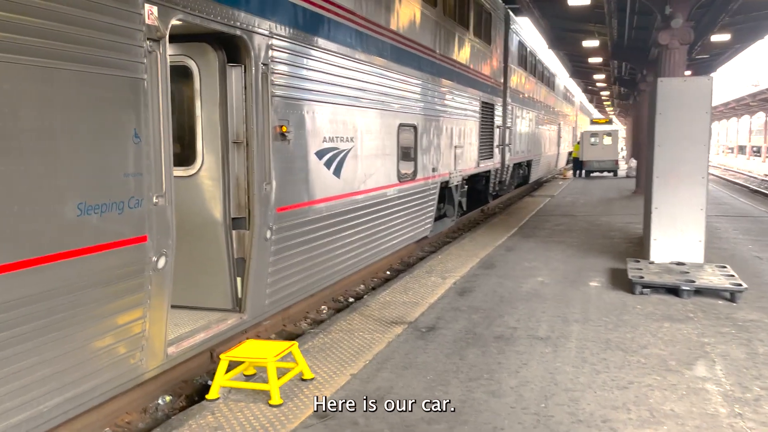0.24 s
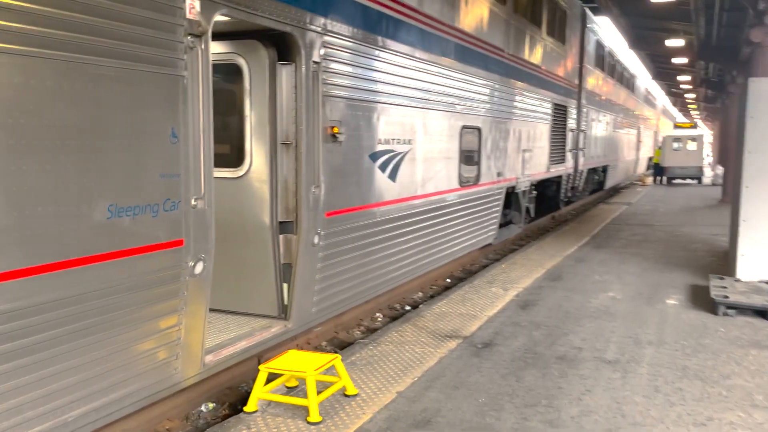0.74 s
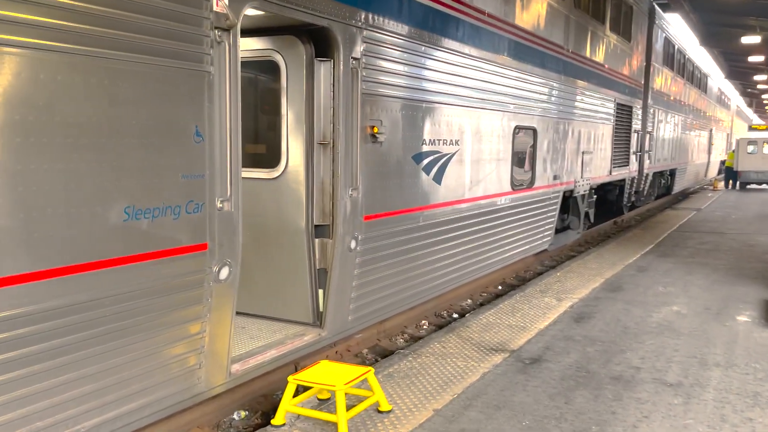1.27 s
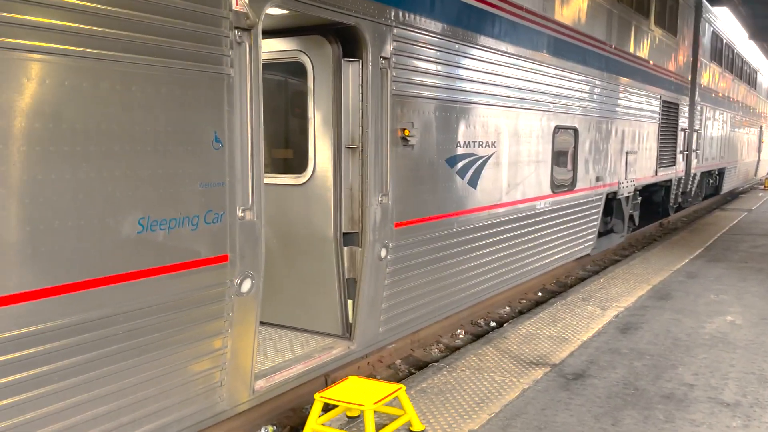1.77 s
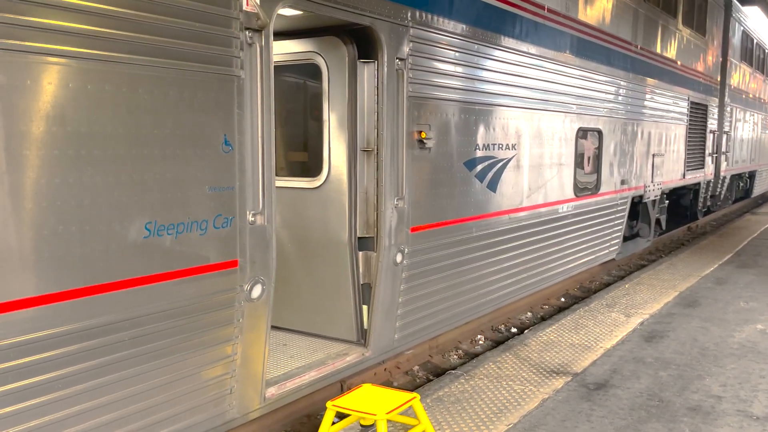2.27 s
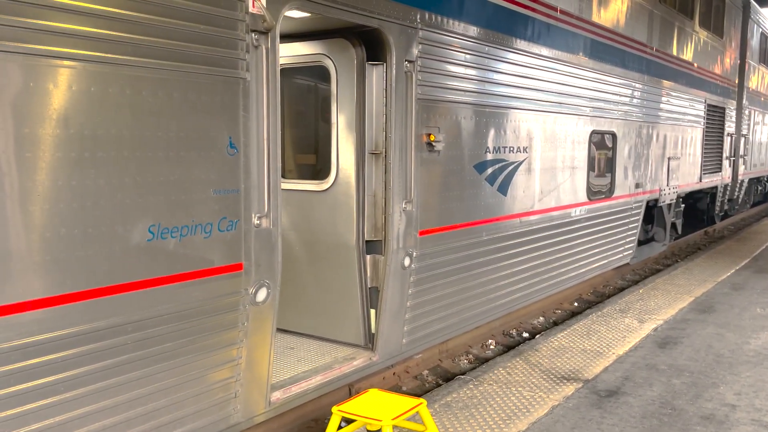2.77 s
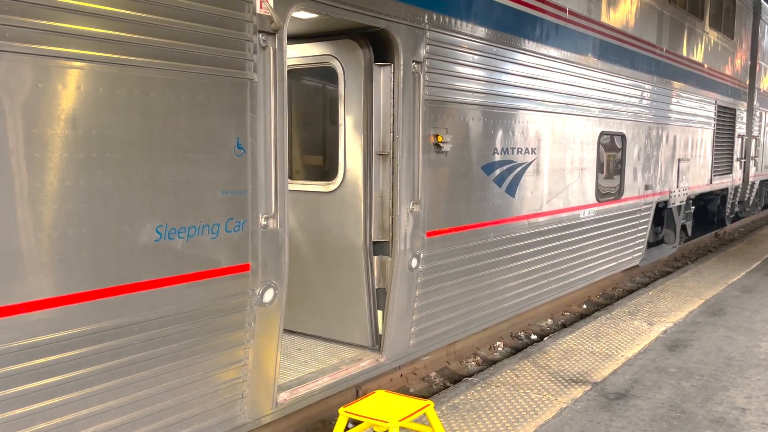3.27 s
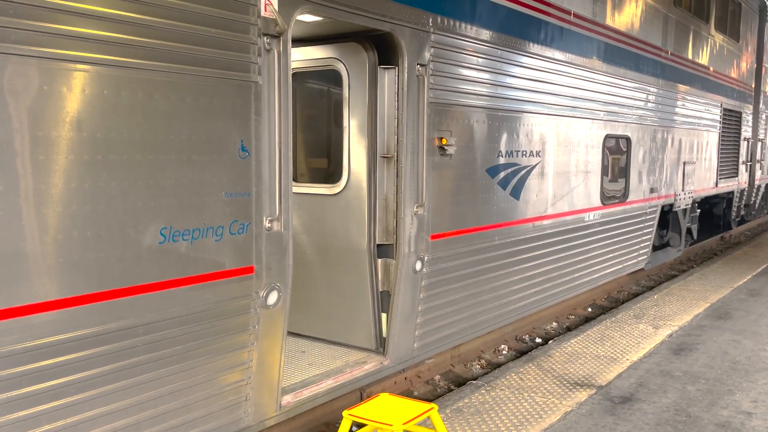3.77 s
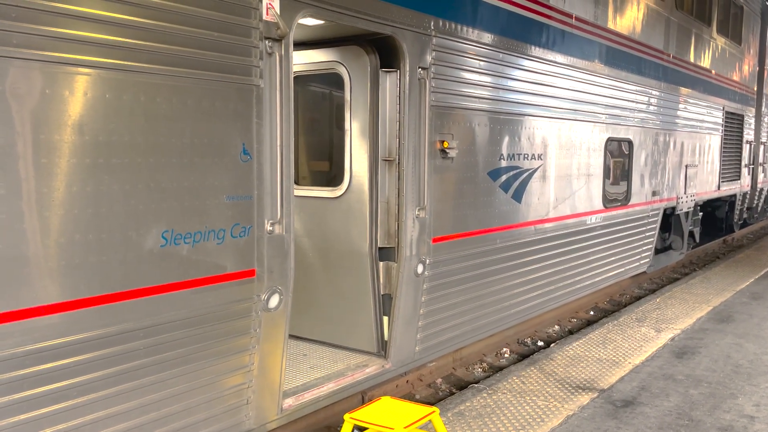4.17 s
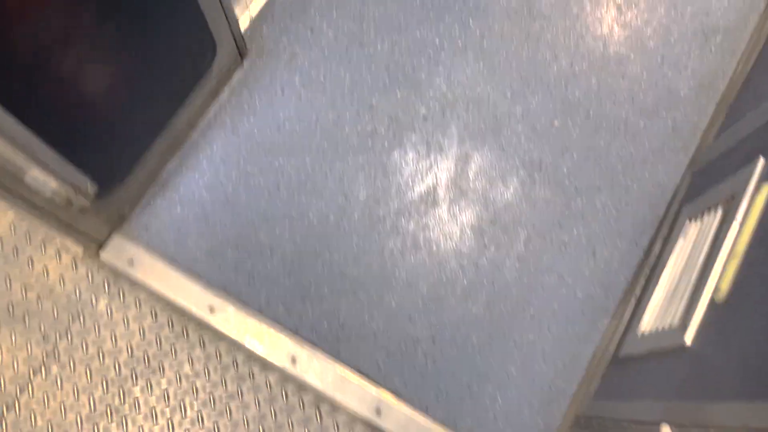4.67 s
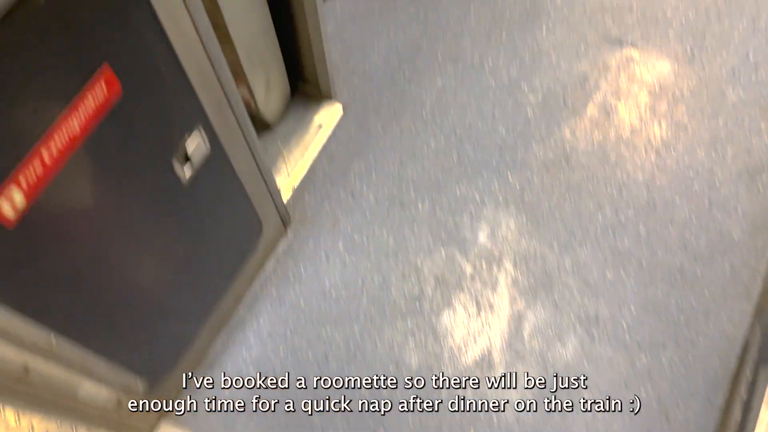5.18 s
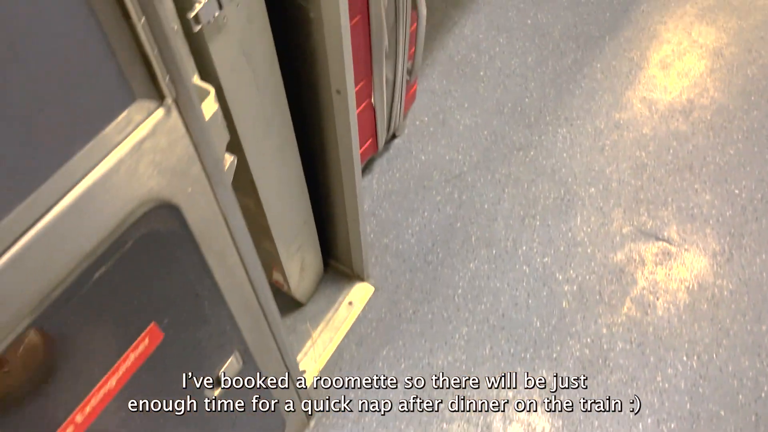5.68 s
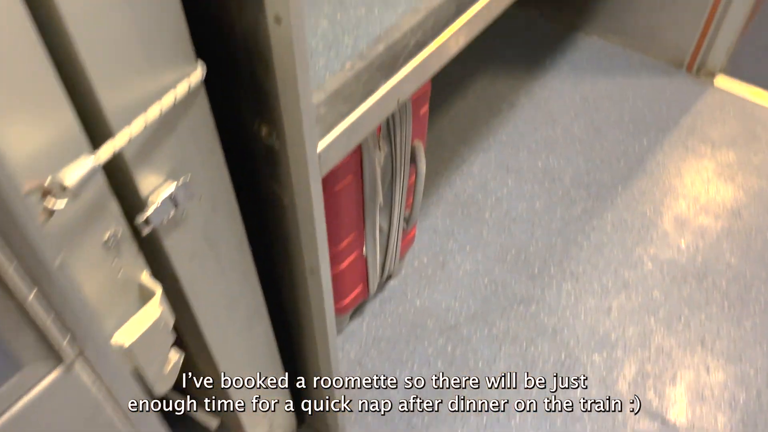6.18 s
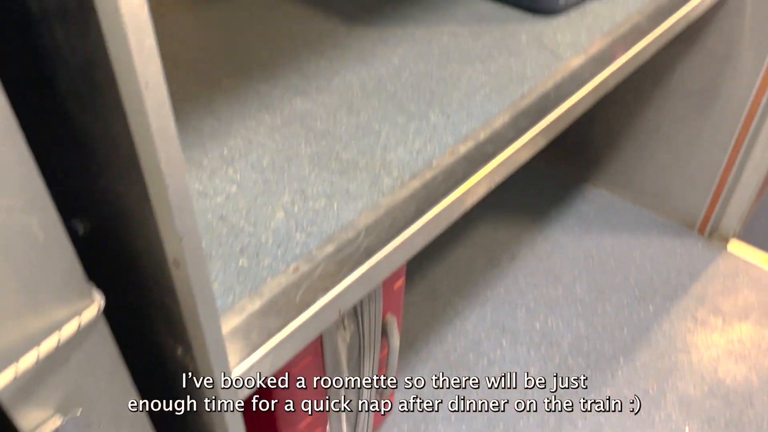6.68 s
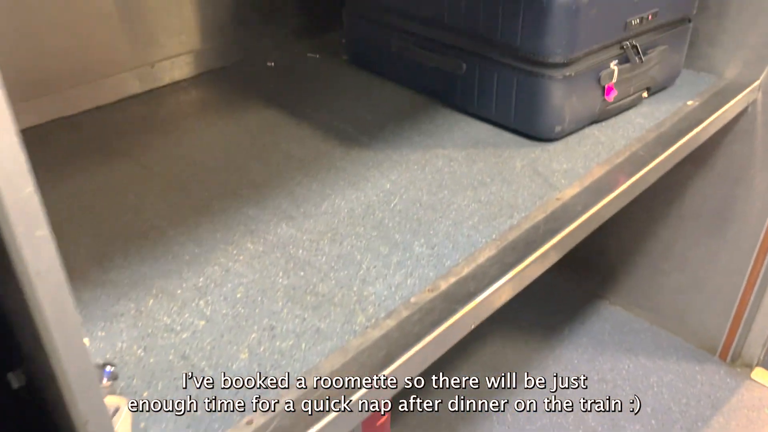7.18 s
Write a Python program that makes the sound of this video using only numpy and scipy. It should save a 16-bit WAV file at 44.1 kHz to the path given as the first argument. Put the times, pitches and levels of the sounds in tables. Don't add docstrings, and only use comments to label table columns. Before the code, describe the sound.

Close stereo pickup of suitcase wheels scraping rough paving, with irregular clacks, hollow thumps and thin ringing metal over a nearby idling diesel engine. The loud outdoor texture dips slightly and switches abruptly to a hushed steel interior, where bass drone and soft airflow continue beneath small ticks and a short, gliding, high squeak. The airy hiss weakens as the listener moves inward.

```python
import sys
import numpy as np
from scipy import signal
from scipy.io import wavfile
from scipy.ndimage import uniform_filter1d

SR = 44100
rng = np.random.default_rng(int(sys.argv[2]) if len(sys.argv) > 2 else 0)


def undo_db(level):
    steps = np.asarray(level, float) / 20
    return 10 ** steps


def wrap_up_sound(samples):
    columns = np.atleast_2d(samples).T
    tamed = np.clip(columns, -1, 1)
    steps = np.round(tamed * 32767).astype(np.int16)
    wavfile.write(sys.argv[1], SR, steps)


N = 327663
T = np.arange(N) / SR
CUT_S = 4.277


def evened(x):
    return x / np.sqrt(np.mean(x ** 2) + 1e-20)


def read(points, hz):
    f, *columns = np.transpose(points)
    return [np.interp(np.log(hz + 1), np.log(f + 1), c)[:, None] for c in columns]


def spread_over_ports(table, z, other, hz):
    like, lead, left_db = read(table, hz)
    like = np.clip(like, 0, 1)
    right = like * z * np.exp(1j * lead) + np.sqrt(1 - like ** 2) * other
    return np.array([z * undo_db(left_db / 2), right * undo_db(-left_db / 2)])


def noise(colour, ports, size, patchy_db, flicker_db):
    frames = 4 * N // size + 5
    hz = np.fft.rfftfreq(size, 1 / SR)
    a, b, c, d, patches = rng.standard_normal((frames, len(hz), 5)).T
    patches = uniform_filter1d(patches, size=6, axis=0)
    patches = evened(uniform_filter1d(patches, size=8192 // size, axis=1))
    flicker = evened(uniform_filter1d(rng.standard_normal(frames), size=4096 // size))
    z = spread_over_ports(ports, a + 1j * b, c + 1j * d, hz)
    z = z * undo_db(read(colour, hz)[0] + patchy_db * patches + flicker_db * flicker)
    return evened(signal.istft(z, nperseg=size, noverlap=3 * size // 4)[1][:, :N])


def placed(x, ports):
    hz, _, z = signal.stft(np.array([x, np.roll(x, shift=-760)]), SR, nperseg=1024)
    return signal.istft(spread_over_ports(ports, z[0], z[1], hz), nperseg=1024)[1][:, :N]


def resonate(x, hz, width):
    turn = np.exp(2j * np.pi * np.cumsum(hz * np.ones(N)) / SR)
    r = np.exp(-np.pi * width / SR)
    return 2 * (turn * signal.lfilter([1 - r], [1, -r], x / turn)).real


def tones(lines, steady, start_s, end_s):
    out = np.zeros(N)
    for hz, width, early_db, late_db in lines:
        fuzz = evened(resonate(resonate(rng.standard_normal(N), hz, width), hz, width))
        sine = np.sin(2 * np.pi * (hz * T + rng.random()))
        sine = sine * (width < hz / 20)
        level = undo_db(np.interp(T, [start_s, end_s], [early_db, late_db]))
        out += level * evened(steady * sine + fuzz)
    return out


def knocks(rows, bed, rise_s, spread):
    out = np.zeros((2, N))
    for s, db, hz, t60 in rows:
        at = round(s * SR)
        t = T[:min(round(t60 * SR), N - at)]
        edges = [hz / spread, min(hz * spread, SR / 2.2)]
        band = signal.butter(2, edges, "band", fs=SR, output="sos")
        rattle = evened(signal.sosfilt(band, bed[:, at:at + len(t)]))
        out[:, at:at + len(t)] += rattle * undo_db(db - 60 * t / t60) * (1 - np.exp(-t / rise_s))
    return out


def swells(floor_db, peak_s, rise_s, fall_s, peak_db):
    late = T[::64, None] - peak_s
    edge_db = 12
    bumps = undo_db(peak_db - edge_db * np.maximum(late / fall_s, -late / rise_s))
    return np.interp(T, T[::64], np.sqrt(undo_db(floor_db) ** 2 + (bumps ** 2).sum(axis=1)))


# pitch_hz, likeness_0_to_1, right_lead_rad, left_over_right_db
PLATFORM_PORTS = [(120, .975, 0, .5), (330, .6, 0, 1), (650, .2, 2.5, 1), (1400, .3, 2.8, 0),
                  (1800, .4, 1.2, -4), (2200, .7, 0, 1), (2800, .5, -1., 2), (4500, .68, -.2, 2),
                  (5600, .35, 0, 0), (6300, .5, 1.8, 2), (7500, .95, 3.1, 0), (11400, .995, 6.28, 0),
                  (14200, .99, 9.3, 0), (16000, .99, 9.5, 0)]
# pitch_hz, density_db_per_hz
RUMBLE_COLOUR = [(20, -45), (40, -18), (65, 9), (90, 1.5), (130, -5), (200, -22), (400, -60)]
# time_s, level_db
IDLE_LEVEL = [
    (0, -25.5),
    (.7, -20),
    (1.5, -19.5),
    (1.9, -22.5),
    (2.6, -18.5),
    (3.5, -23.5),
    (3.72, -18.5),
    (4.0, -25),
    (4.2, -21.5),
]


def engine_rumble():
    time_s, level_db = np.transpose(IDLE_LEVEL)
    level = undo_db(np.interp(T, time_s, level_db) - 2.5)
    return level * noise(RUMBLE_COLOUR, PLATFORM_PORTS, size=2048, patchy_db=-1.3, flicker_db=-1.7)


# pitch_hz, width_hz, early_db, late_db
ENGINE_TONES = [
    (81.78, 4.7, -24, -29.5),
    (71, 8, -29, -41),
    (2206, 25, -56, -56),
    (2792, 42, -52.5, -44),
]


def engine_hum():
    return placed(tones(ENGINE_TONES, steady=0.57, start_s=1.0, end_s=4.1), PLATFORM_PORTS)


# peak_s, rise_s, fall_s, grit_db, scrape_db
ROUGH_STRETCHES = [(.28, 0.014, 0.17, -23.5, -35), (0.384, 0.037, 0.16, -21.5, -37),
                   (.64, 0.29, .3, -29, -42), (.965, .02, 0.25, -27.5, -40),
                   (1.09, 0.14, 0.097, -24.5, -41), (1.3, 0.036, 0.28, -29, -35),
                   (1.46, 0.086, 0.2, -30.5, -39.5), (1.68, 0.092, 0.2, -34.5, -40),
                   (1.94, 0.062, 0.28, -31, -39.5), (2.24, 0.1, 0.44, -27.5, -39.5),
                   (2.41, 0.09, 0.18, -24, -36), (2.5, 0.073, 0.14, -25, -34),
                   (2.63, 0.076, 0.15, -30, -37.5), (2.921, 0.11, 0.25, -23, -36.5),
                   (3.11, 0.07, 0.34, -26, -37.5), (3.2, .08, 0.14, -24, -35),
                   (3.45, 0.072, 0.13, -40, -42), (3.61, 0.11, 0.19, -26.5, -37.5),
                   (3.85, .05, 0.12, -25.5, -36), (4.1, 0.018, 0.15, -35, -36)]
# pitch_hz, density_db_per_hz
GRIT_COLOUR = [(200, -30), (500, 2), (800, 2), (1250, 0.5), (1600, -3.5), (2200, -6), (3200, -9.5),
               (4500, -16), (6000, -18), (9000, -59)]


def wheel_grit():
    *shape, grit_db, _ = np.transpose(ROUGH_STRETCHES)
    level = swells(-32.5, *shape, grit_db) * undo_db(4.0)
    return level * noise(GRIT_COLOUR, PLATFORM_PORTS, size=1024, patchy_db=1.5, flicker_db=0.3)


# pitch_hz, density_db_per_hz
SCRAPE_COLOUR = [(2000, -2), (4000, -3.5), (5500, 0.5), (6500, -1.5), (8000, -2), (10000, -8),
                 (12000, -14.5), (13200, -34), (14500, -24), (16000, -34)]


def wheel_scrape():
    *shape, _, scrape_db = np.transpose(ROUGH_STRETCHES)
    level = swells(-56, *shape, scrape_db) * undo_db(3.5)
    return level * noise(SCRAPE_COLOUR, PLATFORM_PORTS, size=256, patchy_db=1.0, flicker_db=1.26)


# pitch_hz, density_db_per_hz
BOOM_COLOUR = [(60, -33), (130, 1), (250, -2), (400, -6), (600, -11), (1000, -16), (2000, -53.5)]
# peak_s, level_db
CASE_BUMPS = [(.18, -24.5), (.55, -26.5), (.68, -18), (.98, -24), (1.26, -18), (1.39, -21), (1.52, -19.5),
              (1.68, -22), (1.9, -27), (2.25, -20), (2.51, -26), (2.76, -24), (3.13, -20), (3.59, -21.5),
              (3.74, -27), (3.85, -21), (4.07, -21.5)]


def case_boom():
    *shape, grit_db, _ = np.transpose(ROUGH_STRETCHES)
    bump_s, bump_db = np.transpose(CASE_BUMPS)
    rolling = swells(-26, *shape, grit_db + 1)
    bumping = swells(-99, bump_s, 0.029, 0.07, bump_db)
    shaking = np.hypot(rolling, bumping) * undo_db(2.5)
    return shaking * noise(BOOM_COLOUR, PLATFORM_PORTS, size=2048, patchy_db=2.0, flicker_db=0.9)


# start_s, level_db, centre_hz, t60_s
JOINT_JOLTS = [(0.2688, -17, 1880, 0.39), (0.375, -7.5, 2420, 0.27), (0.9532, -13, 1360, 0.18),
               (1.0724, -9, 2050, 0.12), (1.2794, -22, 1810, 0.3), (1.9094, -19, 1900, 0.16),
               (2.3814, -26, 1690, 0.28), (2.4843, -10.5, 1890, 0.55), (2.8784, -22, 1730, 0.42),
               (3.0614, -14.5, 1270, 0.34), (3.1894, -21, 2300, 0.42), (3.5964, -14, 1740, 0.2),
               (3.8294, -26, 1350, 0.3), (4.0894, -42, 1350, 0.3)]


def wheel_jolts():
    bed = noise(GRIT_COLOUR, PLATFORM_PORTS, size=512, patchy_db=3.5, flicker_db=1.5)
    return undo_db(-9.) * knocks(JOINT_JOLTS, bed, rise_s=.008, spread=1.4)


# start_s, pitch_hz, level_db, t60_s
METAL_RINGS = [(.3, 2800, -42, .8), (.385, 2450, -36, .5), (1.06, 2100, -38, .4), (2.045, 4140, -44, 1.5),
               (2.17, 4150, -43, .5), (2.49, 2100, -32, .5), (3.19, 2050, -33, .4), (3.6, 6200, -52, .5),
               (3.6, 830, -33, .5), (3.615, 1750, -35, .5), (3.76, 1850, -30, .5), (3.85, 7600, -47, 2.5),
               (3.85, 12200, -62, 2.5), (3.85, 14100, -64, 2.5), (3.935, 2975, -31, .4),
               (3.99, 2985, -41, .5), (4.02, 2985, -36, .9), (4.235, 2790, -35, 2.), (1.27, 150, -24, 1.),
               (1.47, 265, -25, 1.), (2.23, 205, -26, .8), (2.48, 255, -24, .8), (3.52, 147, -23, 1.2),
               (.98, 740, -33, .6)]


def struck_metal():
    out, shake = np.zeros(N), rng.standard_normal(N)
    for s, hz, db, t60 in METAL_RINGS:
        t = np.maximum(T - s, 0)
        rough = evened(resonate(resonate(shake, hz, 60.), hz, 60.))
        ring = np.sin(2 * np.pi * hz * T) + .5 * rough
        out += ring * undo_db(db - 60 * t / t60) * np.minimum(t / .02, 1)
    return placed(out, PLATFORM_PORTS)


def platform():
    train = engine_rumble() + engine_hum()
    case = wheel_grit() + wheel_scrape() + case_boom() + wheel_jolts() + struck_metal()
    return train + case


# pitch_hz, likeness_0_to_1, right_lead_rad, left_over_right_db
CARRIAGE_PORTS = [(60, .999, 0, -.2), (300, .95, 0, -.5), (750, .2, 0, -1), (2000, .5, 0, 1),
                  (3500, .2, 0, 0), (5300, .25, -.5, 0), (6500, .75, -1.5, 0), (11500, .98, -3.14, 0),
                  (13000, .95, -3.5, 0), (15500, .8, -4.5, 0)]
# pitch_hz, density_db_per_hz
DRONE_COLOUR = [(20, -30), (35, 2), (52, 10.5), (70, 1.5), (97, 8), (125, -1), (160, -12.5), (300, -43)]


def floor_drone():
    return undo_db(-32.5) * noise(DRONE_COLOUR, CARRIAGE_PORTS, size=2048, patchy_db=0.0, flicker_db=-.5)


# pitch_hz, density_db_per_hz
AIR_COLOUR = [(100, -29), (170, -2), (240, 1.5), (310, -7), (450, -3), (600, -10), (1000, -15), (1600, -23),
              (2000, -22), (2500, -25), (2900, -24.5), (3500, -28.5), (5000, -30.5), (9000, -63)]
# pitch_hz, density_db_per_hz
TREBLE_COLOUR = [(3000, -20), (6000, -2.5), (9000, -3), (11000, 2), (13000, -1), (14500, -3), (17000, -4)]


def ventilation_air():
    walked_s = np.maximum(T - CUT_S, 0)
    air = noise(AIR_COLOUR, CARRIAGE_PORTS, size=1024, patchy_db=1.5, flicker_db=0.4)
    treble = noise(TREBLE_COLOUR, CARRIAGE_PORTS, size=512, patchy_db=1.0, flicker_db=.7)
    return undo_db(-39.5 - 1.23 * walked_s) * air + undo_db(-50 - 4.5 * walked_s) * treble


# pitch_hz, width_hz, early_db, late_db
FAN_TONES = [
    (53.8, 9, -43, -43),
    (97, 8, -40, -38),
    (199, 3, -58, -49),
    (242, 4, -49, -55),
    (463, 8, -63, -53),
    (440, 12, -66, -57),
    (700, 5, -54, -67),
    (2850, 260, -67, -65),
    (4170, 220, -72, -76),
]


def fan_hum():
    return placed(tones(FAN_TONES, steady=2.1, start_s=4.7, end_s=7.0), CARRIAGE_PORTS)


# start_s, level_db, centre_hz, t60_s
SMALL_TAPS = [(4.92, -48, 850, .3), (4.93, -48, 380, .3), (4.93, -56, 1900, .25), (6.105, -56, 2850, .25),
              (6.088, -57, 4480, .25), (6.112, -62, 3800, .12), (6.47, -55, 3000, .3),
              (6.48, -60, 3350, .2), (6.683, -54, 2350, .15), (6.335, -61, 2800, .3), (6.2, -59, 2900, .2),
              (6.44, -58, 2700, .2), (6.66, -61, 2900, .3), (6.9, -58, 2800, .2), (7.05, -62, 2850, .3),
              (7.255, -61, 2700, .3)]


def fitting_taps():
    colour = [(300, 0), (6000, -6), (9000, -25)]  # pitch_hz, density_db_per_hz
    bed = noise(colour, CARRIAGE_PORTS, size=256, patchy_db=2.2, flicker_db=2.5)
    return undo_db(5) * knocks(SMALL_TAPS, bed, rise_s=.004, spread=1.07)


# start_s, length_s, from_hz, to_hz, level_db
HINGE_SLIPS = [
    (5.2, .05, 4000, 4120, -64),
    (5.245, .115, 4230, 4400, -62),
    (5.35, .065, 4400, 4850, -62),
    (5.41, .09, 4800, 4850, -67),
    (5.49, .05, 4900, 4700, -61),
    (5.535, .06, 4500, 4020, -62),
    (5.66, .05, 4050, 4150, -67),
]


def hinge_squeak():
    out, shake = np.zeros(N), rng.standard_normal(N)
    for s, length, from_hz, to_hz, db in HINGE_SLIPS:
        along = np.clip((T - s) / length, 0, 1)
        hz = from_hz + (to_hz - from_hz) * along
        whistle = np.sin(2 * np.pi * np.cumsum(hz) / SR) + .4 * evened(resonate(shake, hz, 50.))
        out += whistle * undo_db(db) * np.sqrt(abs(np.sin(np.pi * along))) * (along < 1)
    return np.array([[2.3], [-.45]]) * out


def carriage():
    return floor_drone() + ventilation_air() + fan_hum() + fitting_taps() + hinge_squeak()


def scene():
    inside = np.clip((T - CUT_S) / 0.0015, 0, 1)
    eased = undo_db(-4 * np.clip(1 + (T - CUT_S) / 0.099, 0, 1))
    return (1 - inside) * eased * platform() + inside * carriage()


def roll_off(x):
    return signal.sosfilt(signal.butter(12, 17080, fs=SR, output="sos"), x)


def record(dry):
    lowpass = signal.firwin(511, 15740, window=("kaiser", 9), fs=SR)
    limited = signal.oaconvolve(dry, lowpass[None], "same")
    return roll_off(limited)


dry = scene()
out = record(dry)
wrap_up_sound(out)
```